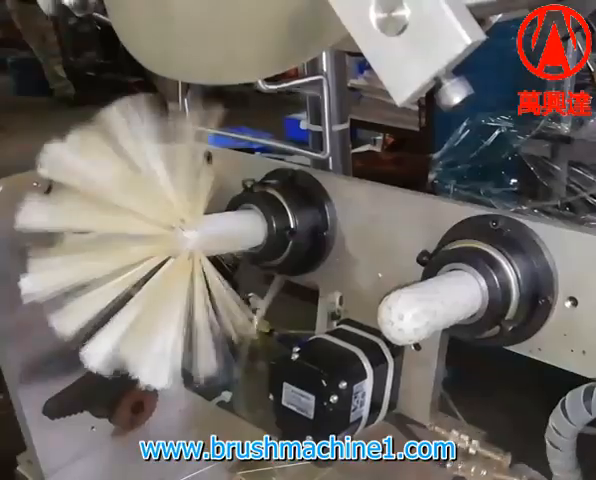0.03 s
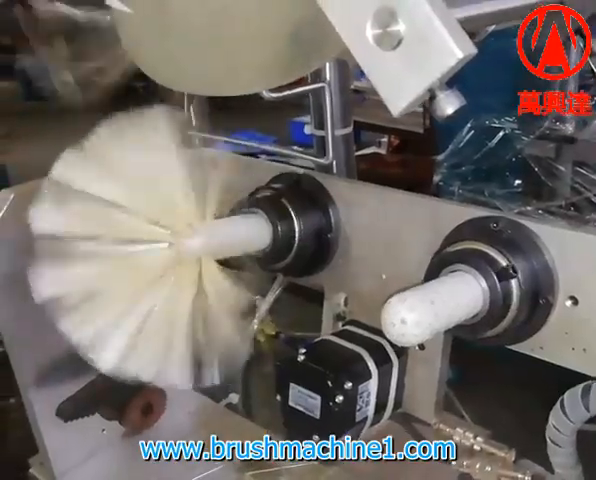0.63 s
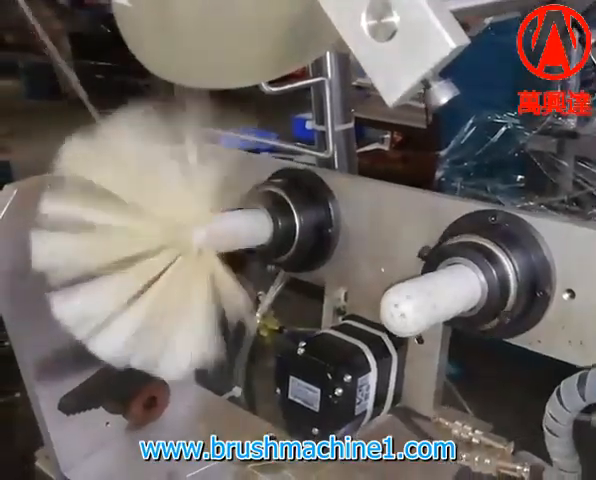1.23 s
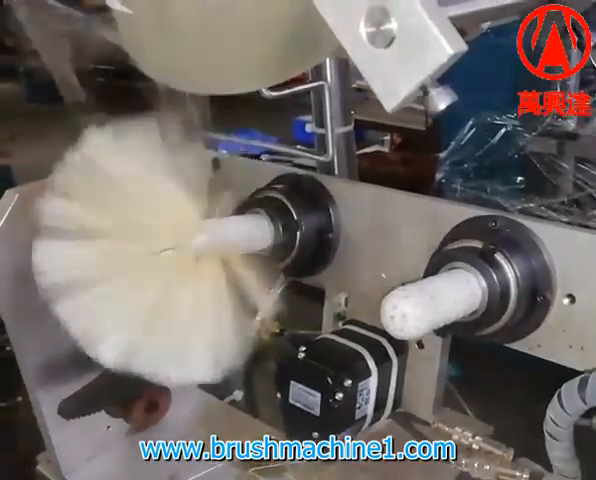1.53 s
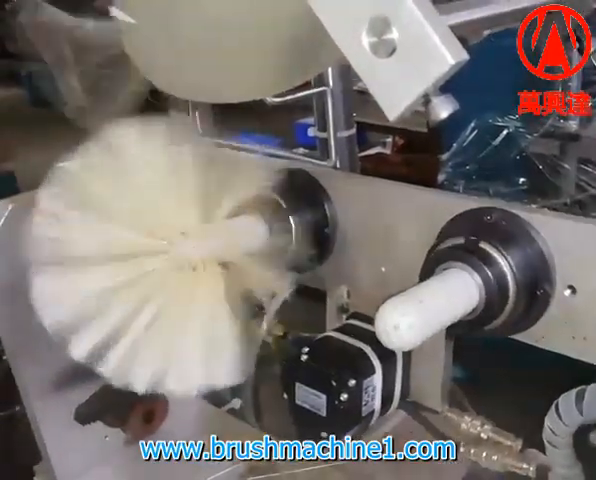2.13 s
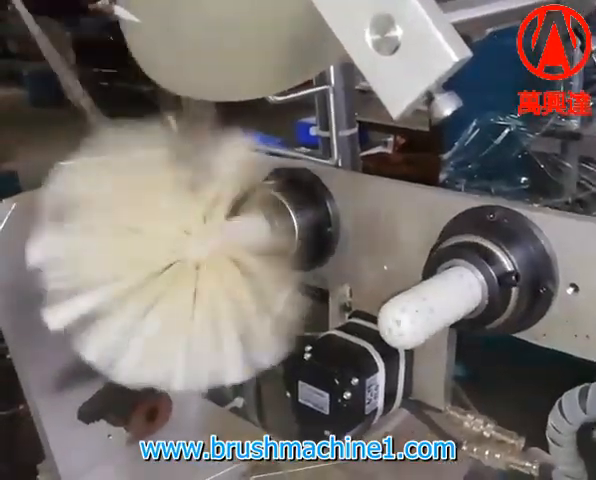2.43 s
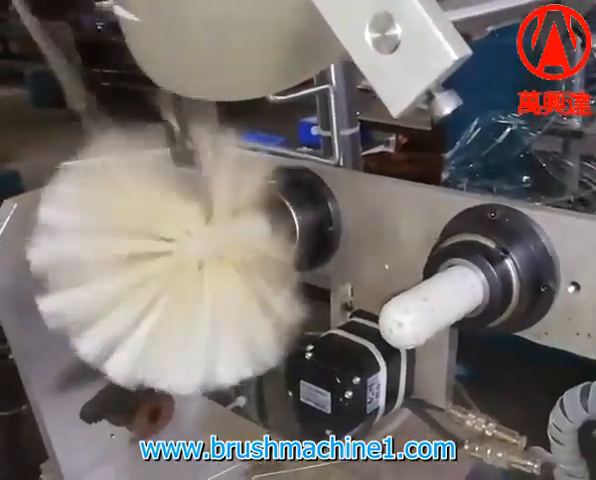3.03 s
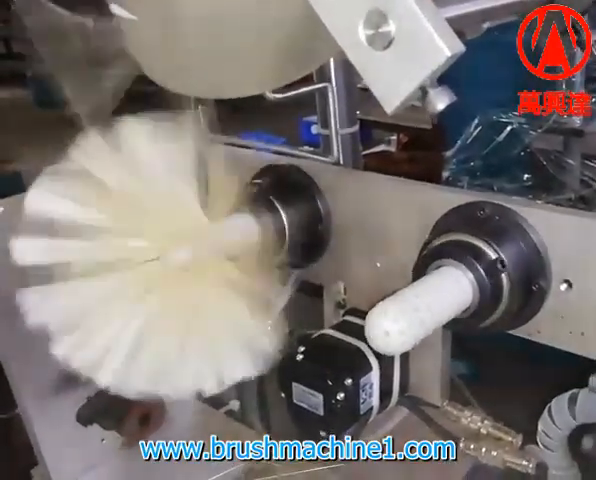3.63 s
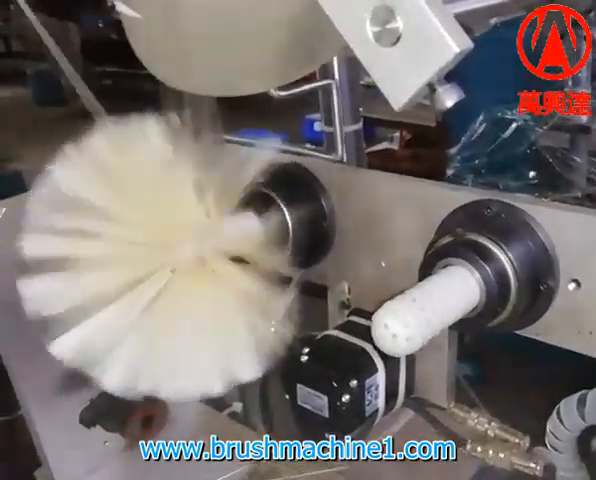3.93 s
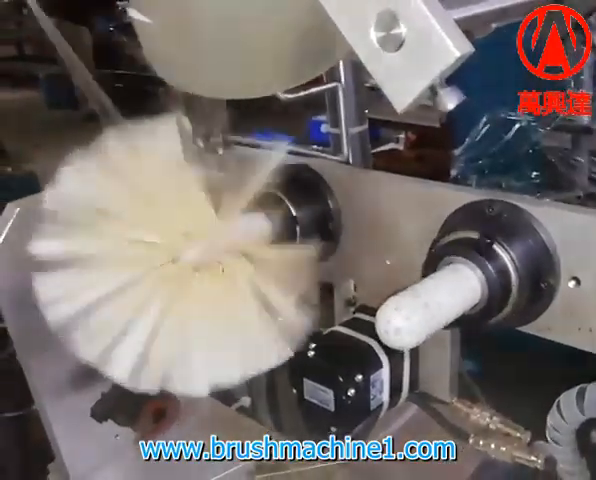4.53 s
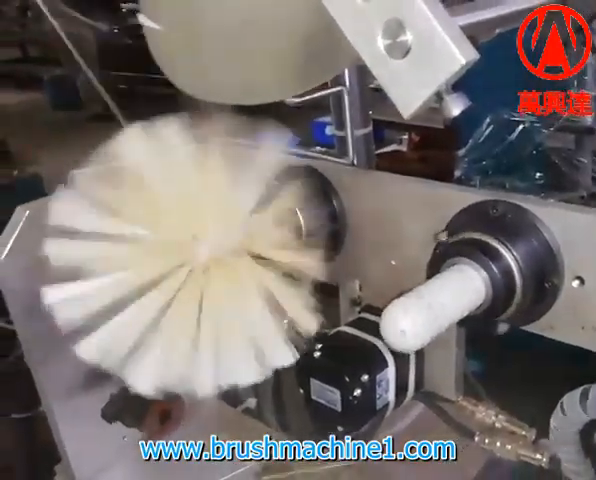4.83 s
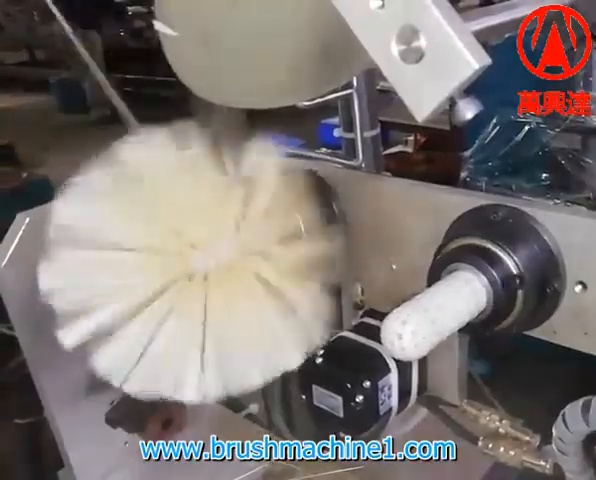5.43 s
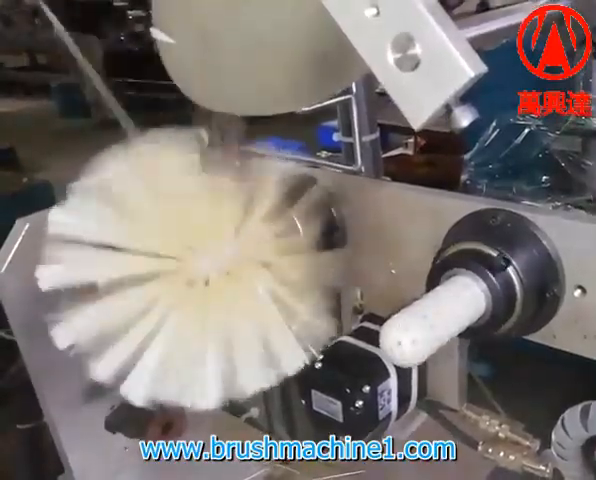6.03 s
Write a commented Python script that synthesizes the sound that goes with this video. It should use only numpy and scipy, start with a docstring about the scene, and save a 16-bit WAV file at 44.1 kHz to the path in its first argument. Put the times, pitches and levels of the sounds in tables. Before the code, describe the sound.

Loud, fast rhythmic clinking and rattling of a bristle-punching machine that starts with a clack and keeps running in a workshop.

```python
"""A brush tufting machine clacks on, runs up and punches in about eight tufts a second.
On every turn of its crank the loose links clink and knock, the steel punch squeals and rings,
slides chatter, cams rumble, bristles rustle and the frame shakes. The clutch grabs with a puff of air,
servos hum in short glides and small parts ping. A hard workshop throws back the metallic hits,
and a phone a metre away hears it all in stereo."""
import sys
import numpy as np
from scipy import signal
from scipy.fft import rfft, irfft
from scipy.io import wavfile
from scipy.ndimage import uniform_filter1d

SR = 44100
rng = np.random.default_rng(int(sys.argv[2]) if len(sys.argv) > 2 else 0)


def unload_audio(sound):
    """Save the sound as a 16-bit wav file, at the path given as the first command line argument."""
    columns = np.transpose(np.atleast_2d(sound))
    # keep every value between -1 and 1, then stretch to whole-number steps
    steps = np.round(np.clip(columns, -1, 1) * 32767)
    wavfile.write(sys.argv[1], SR, steps.astype(np.int16))


N = 276948
TIME = np.arange(N) / SR
FREQ = np.fft.rfftfreq(2 * N, 1 / SR)

# links taking up their play: share of a turn after the punch, bright clink level/dB, dull clack level/dB
LINK_HITS = [(0, 0.5, -14), (.047, 2.5, -15), (.085, -21, -2.5), (.17, -1, -1), (.258, -0.5, -12),
             (.377, -5.5, -6.5), (.415, -6, -11), (0.485, -0.5, -24), (.573, 2.5, -0.5), (0.639, -3, 0.5),
             (.70, -3, -8), (0.772, 0, -5), (.825, -5.5, -1.5), (0.878, 2.5, -8), (0.907, -10.5, -10)]
# tone colour of steel on steel: f/Hz, level/dB
STEEL_EQ = [(300, -23), (1500, -20.5), (3000, -12), (4600, -7), (5800, 3), (6350, 1.5), (7100, -9),
            (7700, -45.5), (11000, -23), (16000, -45)]
# the slow strokes of the run-up: t/s
RUN_UP_STROKES = [.35, .61, .763]


def strokes(full_speed_s=.885, turn_s=.12323):
    """The machine's beat: one stroke a turn, three while running up, then a nearly steady pulse."""
    # how far the loaded crank drags behind the beat: t/s, lag/s
    drag = [(1.25, -.001), (1.7, .0013), (2.25, -.0012), (3.15, -.001), (3.65, .0026), (4.7, .0012),
            (6.2, -.002)]
    beat = np.arange(full_speed_s, TIME[-1] + turn_s, turn_s)
    return np.r_[RUN_UP_STROKES, beat + np.interp(beat, *np.transpose(drag))]


def each_turn(share, jitter_s):
    """The moments at which the crank passes one point of its turn."""
    beat = strokes()
    return beat + share * np.gradient(beat) + jitter_s * rng.standard_normal(len(beat))


def effort(times, on_s=.036):
    """How hard the machine works, as a gain for its moving parts."""
    # from the jolt of switching on up to full speed: t/s, level/dB
    drive = [(.04, -2), (.12, -21.5), (.42, -10.5), (.52, -11), (.62, 0), (.9, 1.3)]
    return undb(np.interp(times, *np.transpose(drive))) * (times > on_s)


def crank():
    """The crank's place in its turn (0-1), and the load on cams, slides and bristles there."""
    # load through one turn: share of the turn, cam level/dB, slide level/dB, bristle level/dB
    load_cycle = [(0, -3.5, -3.5, 11.5), (.1, 2, -1.5, 10), (.2, -1, -4, 3.5), (.33, 1, -2, 4),
                  (.45, -4, -2.5, 7.5), (.55, -4.5, -2, 8.5), (.65, -5.5, 3, 6.5), (.78, 4.5, 3, 3.5),
                  (.9, 1, -0.5, 14.5), (1, 2.5, 0, 12.5)]
    beat = strokes()
    turn = np.interp(TIME, np.r_[0, beat], np.r_[.5, 1 + np.arange(len(beat))]) % 1
    share, *loads = np.transpose(load_cycle)
    return turn, *(undb(np.interp(turn, share, db)) * effort(TIME) for db in loads)


def tightness(times, tightest_s=1.2, cycle_s=.716):
    """Tufts fit their holes tightly (1) and loosely (-1) by turns."""
    return np.cos(2 * np.pi * (times - tightest_s) / cycle_s)


def links(db=-23.5, scatter_db=2.5, jitter_s=.00039, latch_db=-36, latch_share=.573):
    """Loose links clink at the same points of every turn; the bristle picker's latch adds its own note."""
    # latch modes: f/Hz, width/Hz, level/dB
    latch_modes = [(3790, 210, 20), (8700, 220, -9.5)]
    shares, clink_db, _ = np.transpose(LINK_HITS)
    times = np.concatenate([each_turn(share, jitter_s) for share in shares])
    sizes = undb(np.repeat(clink_db, len(strokes())) + scatter_db * rng.standard_normal(len(times)))
    contacts = bursts(times, sizes * effort(times), decay_s=.0038, rise_s=.001)
    steel = filtered(contacts, undb(along(STEEL_EQ)))
    snaps = each_turn(latch_share, jitter_s)
    latch = filtered(bursts(snaps, effort(snaps), decay_s=.0016), resonances(latch_modes))
    return level(steel, db) + level(latch, latch_db)


def punch(db=-35, slide_db=-12, lead_s=.017, rod_db=-33, rod_hz=7272, rod_width_hz=12,
          tight_db=4, scatter_db=1):
    """The punch squeals down its guide, most on a tight tuft, drives the staple home; its rod rings."""
    # modes of the steel punch: f/Hz, width/Hz, level/dB
    punch_modes = [(11800, 500, -18), (14150, 180, -4), (14270, 98, -4), (14950, 400, -15)]
    times = strokes()[len(RUN_UP_STROKES):]
    sizes = undb(tight_db * tightness(times) + scatter_db * rng.standard_normal(len(times)))
    scrape = bursts(times - .001, sizes, decay_s=.0043, rise_s=.002)
    slide = undb(slide_db) * bursts(times - lead_s, sizes, decay_s=.011, rise_s=.0072)
    squeal = filtered(scrape + slide, resonances(punch_modes))
    rod = filtered(blows(times, sizes ** .7 * effort(times)), resonances([(rod_hz, rod_width_hz, 0)]))
    return level(squeal, db) + level(rod, rod_db) * np.array([[1], [.5]])  # rod: full mid, half side


def slides(load):
    """The slides chatter brightly under the crank's load."""
    # tone colour of the chatter: f/Hz, level/dB
    slide_eq = [(200, -18.5), (600, -3.5), (1400, -5.5), (2200, -7.5), (3000, -2.5), (4600, -4.5),
                (5800, 0), (6500, 0), (7300, -9), (7700, -20.5), (16000, -31)]
    return chatter(load, slide_eq, db=-21.5, per_s=1500, spread_db=1.5, decay_s=.0034)


def cams(turn, load, db=-26.5, casting_db=-31.5, repeat_hz=860, size=2048):
    """Followers ride the same bumps on every turn: the rumble repeats, its finer detail does not."""
    # tone colour of the rumble: f/Hz, level/dB
    cam_eq = [(25, -21), (55, -20), (76, 1.5), (105, -4), (135, -7.5), (190, 0.5), (240, -1), (380, -11.5),
              (480, -1), (800, -5.5), (1400, -4.5), (2200, -4.5), (5000, -18.5)]
    # modes of the casting: f/Hz, width/Hz, level/dB
    casting_modes = [(132, 25, -2.5), (271.5, 9, 0), (363.7, 13.6, 5), (588, 19, -7.5), (814, 62, -3),
                     (1283, 17, -1.5), (1495, 14, -10), (1787, 7.7, 3.5), (1918, 14, 3.5), (2693, 13, 1.5),
                     (2890, 52, -9)]
    profiles = irfft(np.exp(2j * np.pi * rng.random((2, size // 2 + 1))))
    bumps = np.array([np.interp(turn * size, np.arange(size), profile) for profile in profiles])
    repeating = 1 / (1 + (FREQ / repeat_hz) ** 2)
    force = filtered(level(bumps, -6) * load, np.sqrt(repeating))
    force += filtered(noise() * load, np.sqrt(1 - repeating))
    rumble = filtered(force, undb(along(cam_eq)))
    ring = filtered(force, resonances(casting_modes))
    return level(rumble, db) + level(ring, casting_db)


def bristles(load):
    """Bristles only rustle in earnest once they are flung about at speed."""
    # tone colour of the rustle: f/Hz, level/dB
    bristle_eq = [(2000, -8), (6000, 10.5), (8300, 2.5), (10000, -3), (12000, -7), (13400, -18),
                  (14400, -20), (15200, -24), (16000, -23)]
    return chatter(load * effort(TIME), bristle_eq, db=-26.5, per_s=2000, spread_db=.9, decay_s=.00097)


def clacks(db=-30, decay_s=.0066, jitter_s=.00025, scatter_db=2.2, size=2048):
    """Every link shakes the casting from its own place, so its dull clack keeps its tone on each turn."""
    # tone colour of the clacks: f/Hz, level/dB
    clack_eq = [(120, -21), (250, -4.5), (380, 1), (520, -2.5), (850, -5.5), (1400, -1), (2200, -8.5),
                (5000, -19)]
    out = 0
    for share, _, clack_db in LINK_HITS:
        times = each_turn(share, jitter_s)
        sizes = undb(clack_db + scatter_db * rng.standard_normal(len(times))) * effort(times)
        body = rng.standard_normal((2, size)) * np.exp(-TIME[:size] / decay_s)
        out = out + signal.oaconvolve(blows(times, sizes)[None], body)[:, :N]
    return level(filtered(out, undb(along(clack_eq))), db)


def frame(db=-31.5, hz=196.4, rise_s=.0088, jitter_s=.00069, scatter_db=2,
          hum_db=-40, hum_cycles_per_turn=24, right_lag_s=.0004):
    """The head shoves the frame, whose main mode swells and fades over the hum of the gears."""
    # shoves of the head: share of a turn, level/dB
    shoves = [(0.18, 1.5), (0.6, -1.5), (0.8, -2.5)]
    # how hard the frame shakes: t/s, level/dB
    shaking = [(.35, -41.5), (.61, -28.5), (1.0, -34.5), (1.55, -38.5), (2.15, -32), (3.05, -37),
               (3.75, -36.5), (4.2, -32), (4.5, -35.5), (5.1, -33.5), (5.75, -36), (6.28, -34.5)]
    # strokes whose first shove is accented: t/s, boost/dB
    accents = [(.885, 5), (3.226, 5.5), (3.35, 6.5), (3.474, 8.5), (3.598, 8), (4.952, 5.5)]
    times = strokes()
    shares, shove_db = np.transpose(shoves)
    sizes_db = shove_db[:, None] + np.interp(times, *np.transpose(shaking))
    sizes_db += scatter_db * rng.standard_normal((len(times), len(shoves))).T
    for at, boost_db in accents:
        sizes_db[0, np.argmin(abs(times - at))] += boost_db
    force = sum(blows(each_turn(share, jitter_s), undb(row)) for share, row in zip(shares, sizes_db))
    ring = TIME * np.exp(-TIME / rise_s) * np.sin(2 * np.pi * hz * TIME)
    strain = undb(np.interp(TIME, *np.transpose(shaking)))  # hard shaking makes the gears hum louder
    hum = np.sin(2 * np.pi * hum_cycles_per_turn * (crank()[0] - shares[0])) * strain * effort(TIME) ** 2
    shake = level(signal.fftconvolve(force, ring)[:N], db) + level(hum, hum_db)
    return filtered(shake, np.exp(-2j * np.pi * np.outer([0, right_lag_s], FREQ)))


def clutch(at_s=.0755, grab_s=.0094, ring_s=.22, judder_depth=.15, judder_hz=110, dull_hz=7500,
           air_db=-31, air_s=.073):
    """The clutch grabs with a puff of air, then judders and rings while it slips."""
    # modes of the clutch plates: f/Hz, width/Hz, level/dB
    plate_modes = [(1115, 116, 3.5), (1340, 110, -3), (2950, 610, -13), (3970, 320, -16.5), (6230, 620, -5)]
    age = np.maximum(TIME - at_s, 0)
    grab = undb(-13) * np.sin(np.pi * np.minimum(age / grab_s, 1)) ** 2
    judder = 1 + judder_depth * np.cos(2 * np.pi * judder_hz * age)
    slip = undb(-25) * np.exp(-age / ring_s) * (age > 0) * judder
    plates = level(filtered(noise(), resonances(plate_modes) / (1 + (FREQ / dull_hz) ** 4)), 2.9)
    hiss = level(filtered(noise(), resonances([(6550, 3500, 0)])), air_db)
    return plates * (grab + slip) + hiss * np.exp(-age / air_s) * (age > 0)


def feed(db=-35, share=.485, jitter_s=.0006, scatter_db=3,
         centre_hz=5950, spread_hz=280, width_hz=900, decay_s=.0034, size=512):
    """The feed clinks half a turn after the punch, a little different in strength and pitch each time."""
    out = np.zeros((2, N + size))
    hz = np.fft.rfftfreq(size, 1 / SR)
    fade = np.exp(-TIME[:size] / decay_s)
    times = each_turn(share, jitter_s)
    for at in times[times < TIME[-1]]:
        strength, pitch = rng.standard_normal(2)
        peak = 1 / (1 + ((hz - centre_hz - spread_hz * pitch) / width_hz) ** 2)
        ring = irfft(peak * np.exp(2j * np.pi * rng.random((2, len(hz)))))
        first = int(at * SR)
        out[:, first:first + size] += effort(at) * undb(scatter_db * strength) * ring * fade
    return level(out[:, :N], db)


def guard(turn, db=-35, hz=1922, width_hz=26, peak_share=.41, swing_db=4, surge_db=3):
    """The shaking sets a metal guard singing in short surges, most on the return stroke."""
    surge = level(uniform_filter1d(uniform_filter1d(rng.standard_normal(N), size=1500), size=1500), 0)
    swing = np.cos(2 * np.pi * (turn - peak_share))
    drive = noise() * effort(TIME) * undb(swing_db * swing + surge_db * surge)
    return level(filtered(drive, resonances([(hz, width_hz, 0)])), db)


def pings(db=-37, per_s=30, low_hz=2500, high_hz=9800, decay_s=.005,
          range_db=6, tilt_db_per_octave=-4, size=1536):
    """Staple wire and small loose parts ping now and then, each with a short note of its own."""
    out, age = np.zeros((2, N + size)), TIME[:size]
    for when, note, strength, left_phase, right_phase in rng.random((int(per_s * TIME[-1]), 5)):
        at, hz = when * TIME[-1], low_hz * (high_hz / low_hz) ** note
        gain = effort(at) * undb(range_db * strength + tilt_db_per_octave * np.log2(hz / low_hz))
        tone = np.sin(2 * np.pi * (hz * age + np.array([[left_phase], [right_phase]])))
        first = int(at * SR)
        out[:, first:first + size] += gain * np.exp(-age / decay_s) * tone
    return level(out[:, :N], db)


def ticks():
    """Stray ticks of steel, each with a sharp edge of white noise."""
    # single ticks: t/s, body level/dB, edge level/dB
    tick_cues = [(0.037, -21, -51.5), (0.043, -20, -45), (0.06, -16, -40), (0.078, -14, -32),
                 (.433, -22, -28), (0.478, -21, -30), (0.487, -19, -36.5), (0.607, -11, -40),
                 (.618, -10, -40), (.689, -11, -40), (.886, -22, -18), (5.01, -12, -9.5)]
    times, body_db, edge_db = np.transpose(tick_cues)
    body = filtered(bursts(times, undb(body_db), decay_s=.0054), undb(along(STEEL_EQ) + 7.5))
    return body + bursts(times, undb(edge_db), decay_s=.0013)


def squeak():
    """A dry guide squeaks once while the crank is still slow."""
    # partials of the squeak: f/Hz, level/dB
    partials = [(6282, -27.5), (8075, -40), (12053, -45)]
    rub = np.interp(TIME, [.343, .352, .38, .395], [0, .88, .29, 0])
    return rub * sum(np.sqrt(2) * undb(db) * np.sin(2 * np.pi * hz * TIME) for hz, db in partials)


def servos():
    """Servo motors move the brush, each move a short gliding hum that swells and fades."""
    # moves: middle t/s, length/s, start f/Hz, end f/Hz, level/dB
    moves = [(.346, 0.081, 180, 200, -26.5), (0.447, 0.13, 98.7, 103, -38), (0.59, 0.1, 186.6, 192, -23.5),
             (0.604, 0.085, 325, 377, -16), (0.643, 0.11, 186, 180, -20), (3.707, 0.2, 84, 76, -30),
             (3.898, 0.078, 80, 73, -18)]
    out = np.zeros(N)
    for middle, length, from_hz, to_hz, db in moves:
        progress = np.clip((TIME - middle) / length + .5, 0, 1)
        phase = 2 * np.pi * np.cumsum(from_hz + (to_hz - from_hz) * progress) / SR
        out += np.sqrt(2) * undb(db) * np.sin(np.pi * progress) ** 2 * np.sin(phase)
    return out


def thuds(db=-45, push_s=.0041, loose_db=15, scatter_db=2, growth_db_per_s=2.5):
    """On a loose tuft the punch bottoms out and pushes the whole bed, harder as the brush fills."""
    times = strokes()[len(RUN_UP_STROKES):]
    sizes_db = -loose_db * tightness(times) + growth_db_per_s * times
    sizes_db += scatter_db * rng.standard_normal(len(times))
    soft_push = np.exp(-(np.pi * FREQ * push_s) ** 2) * FREQ / (FREQ + 15)
    return level(filtered(blows(times, undb(sizes_db)), soft_push), db)


def bed(travel_db=-33, idle_db=-47):
    """The machine's bed rumbles faintly throughout, and more while the carriage travels."""
    # tone colour of the low rumble: f/Hz, level/dB
    bed_eq = [(15, -20), (35, -2), (80, 7), (120, -1), (250, -38), (1000, -70)]
    travel = np.interp(TIME, [3.6, 3.9, 4.15, 4.45], [0, .91, .49, 0])
    rumble = level(filtered(noise(), undb(along(bed_eq))), 0)
    return rumble * (undb(travel_db) * travel + undb(idle_db) * effort(TIME))


def workshop(x, wet_db=-7, t60_s=.14):
    """Adds dense reflections from the machine's panels and the walls."""
    tail = noise() * np.exp(-np.log(1000) * TIME / t60_s) * (TIME > .003)
    tail /= np.sqrt(np.sum(tail ** 2) / 2)
    return x + undb(wet_db) * signal.fftconvolve(x, tail, axes=1)[:, :N]


def chatter(load, spectrum, db, per_s, spread_db, decay_s):
    """Countless tiny contacts of uneven size, as strong as the load."""
    when, rarity = rng.random((int(per_s * TIME[-1]), 2)).T
    sizes = undb(-spread_db * np.log(np.clip(rarity, .01, 1)))
    contacts = bursts(when * TIME[-1], sizes, decay_s) * load
    return level(filtered(contacts, undb(along(spectrum))), db)


def bursts(times, sizes, decay_s, rise_s=.00063):
    """Each contact is a burst of noise that builds up and dies away."""
    power = blows(times, sizes ** 2) + 1e-18
    for seconds in (decay_s, rise_s):
        pole = np.exp(-2 / (seconds * SR))
        power = signal.lfilter([np.sqrt(1 - pole)], [1, -pole], power)
    return np.sqrt(power * np.sqrt(decay_s / rise_s)) * noise()


def blows(times, sizes):
    """A train of single impulses."""
    inside = (times >= 0) & (times < TIME[-1])
    return np.bincount((times[inside] * SR).astype(int), sizes[inside], N)


def noise():
    """Two unrelated channels of white noise."""
    return rng.standard_normal((2, N))


def resonances(modes):
    """Frequency response of damped modes."""
    return sum(undb(db) * 1j * FREQ * width / (hz ** 2 - FREQ ** 2 + 1j * FREQ * width)
               for hz, width, db in modes)


def along(points):
    """A curve through (f/Hz, value) points on a log frequency axis."""
    hz, value = np.transpose(points)
    return np.interp(np.log(FREQ + 1), np.log(hz), value)


def filtered(x, gain):
    """Apply a frequency response."""
    return irfft(rfft(x, 2 * N) * gain)[..., :N]


def level(x, db):
    """Set the rms level."""
    return x * undb(db) / np.sqrt(np.mean(x ** 2))


def undb(db):
    """Decibels to gain."""
    return 10 ** (np.asarray(db) / 20)


def scene():
    """The whole machine, wide in the treble, centred in the bass: long waves reach both mics alike."""
    # how alike the two microphones sound: f/Hz, likeness (0 wide, 1 mono)
    likeness = [(100, .97), (140, 1.1), (290, 0.68), (640, 0), (1400, 0.27), (3000, 0), (16000, 0)]
    turn, cam_load, slide_load, bristle_load = crank()
    texture = cams(turn, cam_load) + slides(slide_load) + bristles(bristle_load)
    hits = workshop(links() + feed() + punch() + clutch())
    mid, side = hits + guard(turn) + clacks() + texture + bed()
    alike = np.clip(along(likeness), -1, .98)
    mid = filtered(mid, np.sqrt((1 + alike) / 2))
    side = filtered(side, np.sqrt((1 - alike) / 2))
    stereo = np.array([mid + side, mid - side])
    return stereo + ticks() + squeak() + frame() + servos() + thuds() + pings()


def record(dry, top_hz=15700):
    """The left microphone faces the head and gets more of most treble bands; the phone cuts the top."""
    # stereo balance: f/Hz, left minus right level/dB
    balance = [(100, 1), (400, -2), (1300, -0.7), (2400, 0.5), (4400, 0), (6200, 7.5), (7500, -5.5),
               (9500, 0.5), (14400, 4)]
    tilt = undb(np.outer([.5, -.5], along(balance)))
    heard = filtered(dry, tilt / np.sqrt(np.mean(tilt ** 2, axis=0)))
    return signal.sosfilt(signal.ellip(10, .2, 80, top_hz, fs=SR, output="sos"), heard)


dry = scene()
out = record(dry)
unload_audio(out)
```